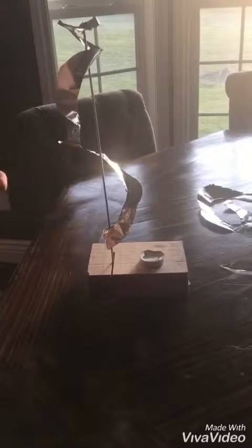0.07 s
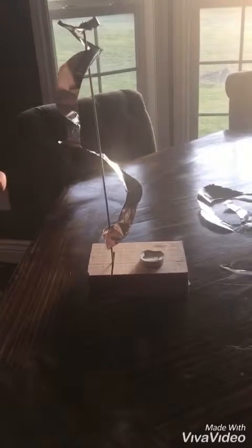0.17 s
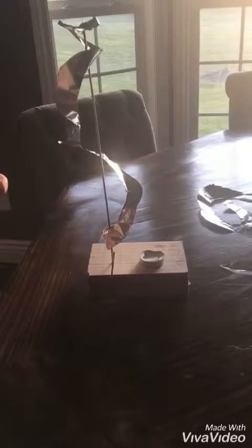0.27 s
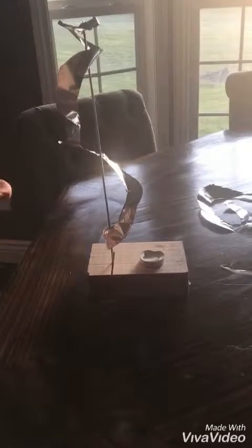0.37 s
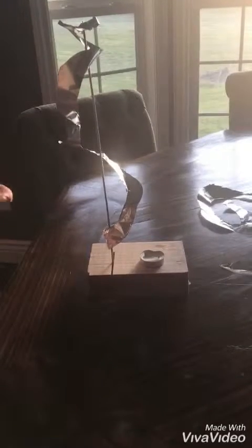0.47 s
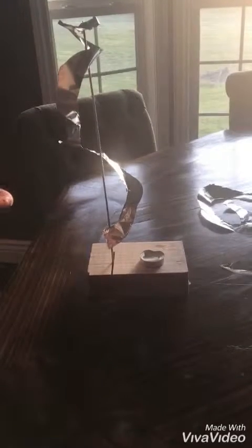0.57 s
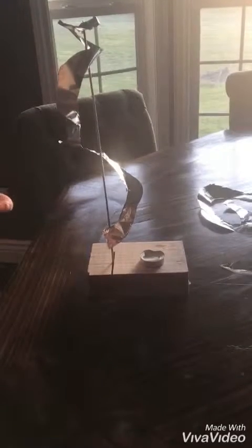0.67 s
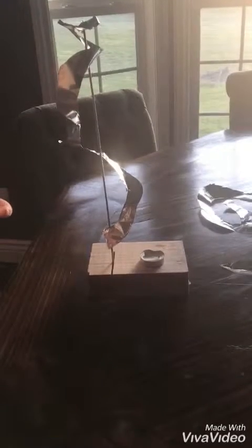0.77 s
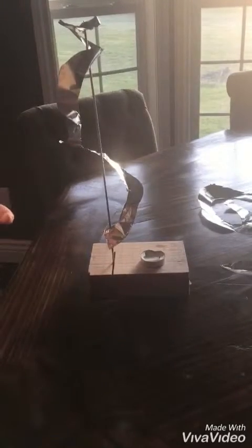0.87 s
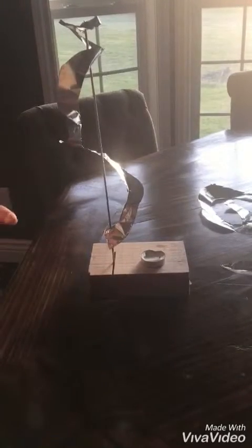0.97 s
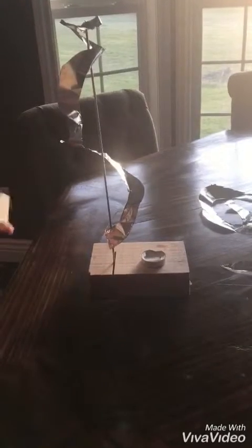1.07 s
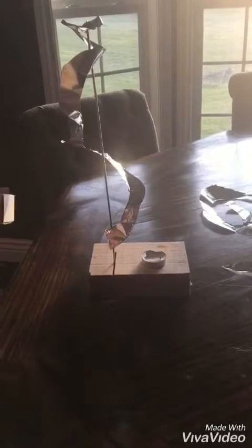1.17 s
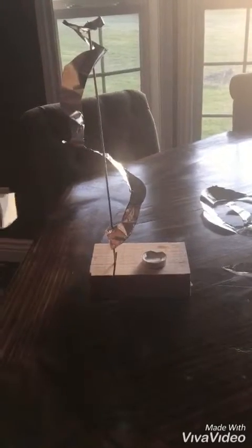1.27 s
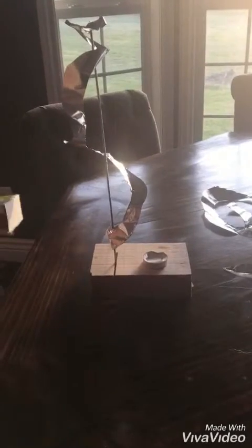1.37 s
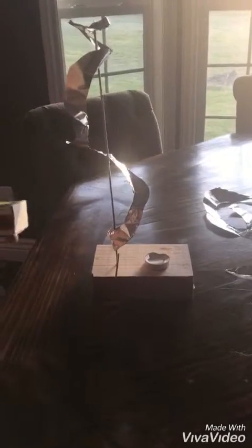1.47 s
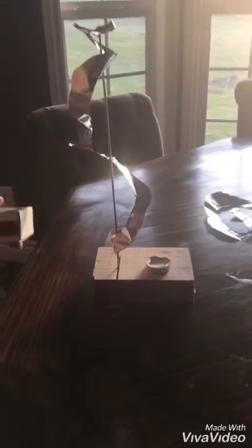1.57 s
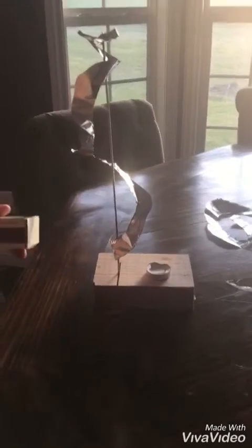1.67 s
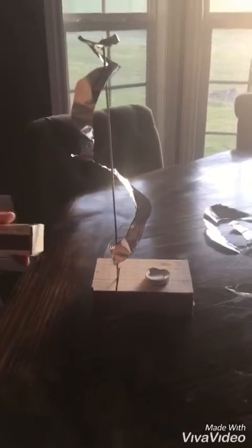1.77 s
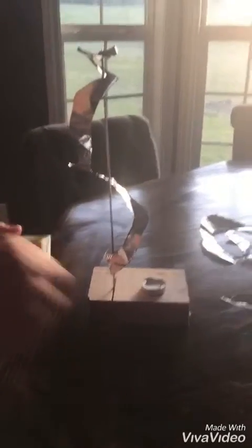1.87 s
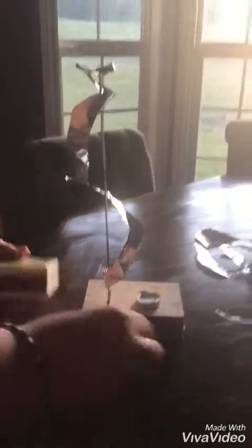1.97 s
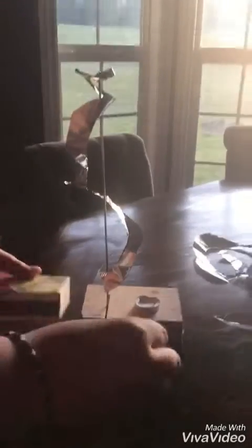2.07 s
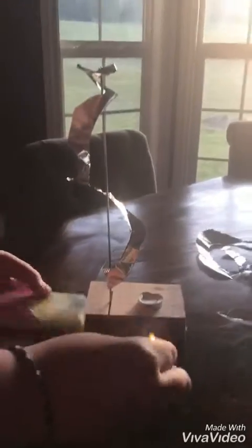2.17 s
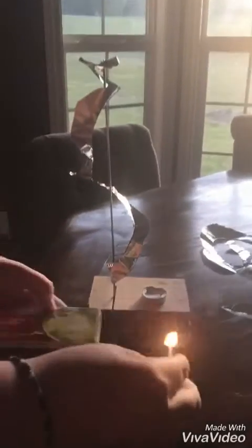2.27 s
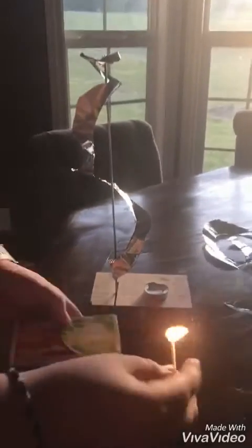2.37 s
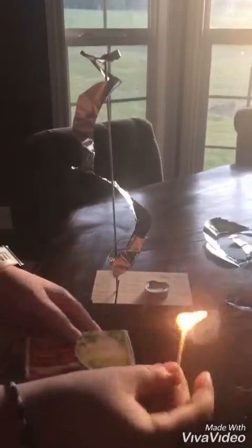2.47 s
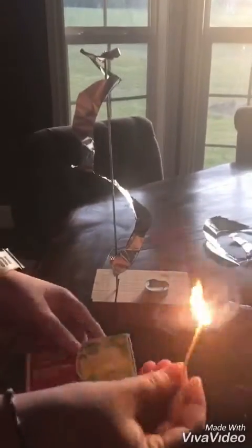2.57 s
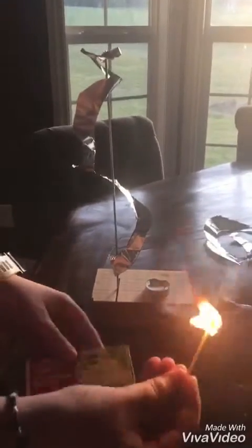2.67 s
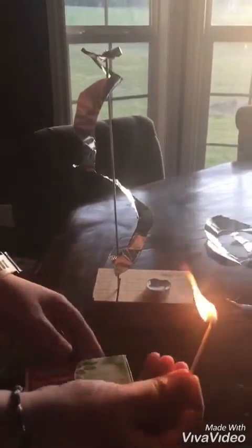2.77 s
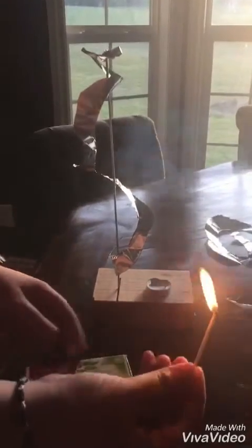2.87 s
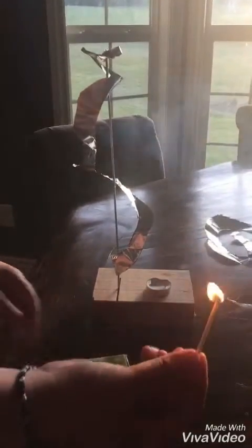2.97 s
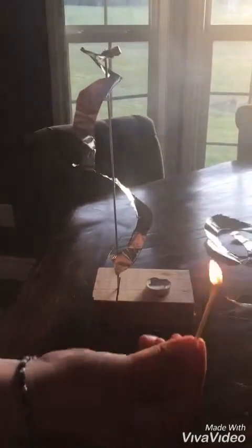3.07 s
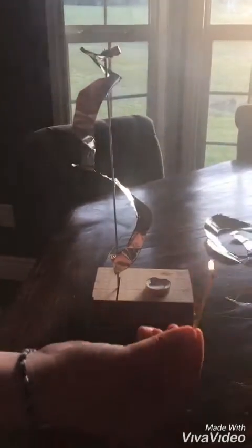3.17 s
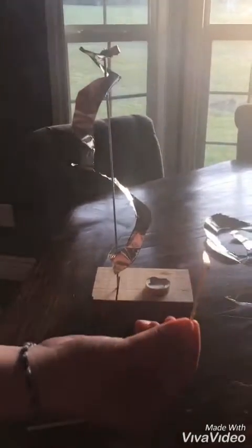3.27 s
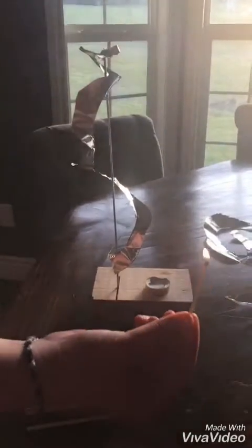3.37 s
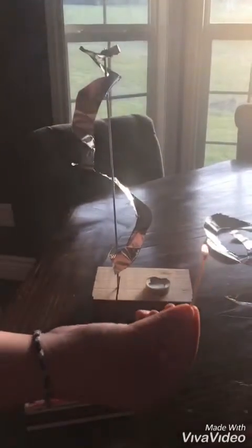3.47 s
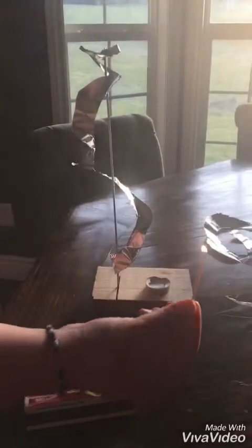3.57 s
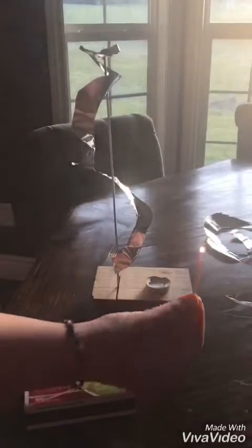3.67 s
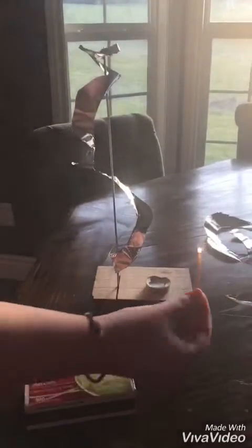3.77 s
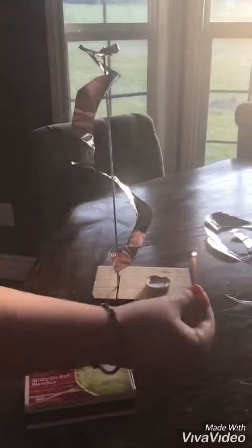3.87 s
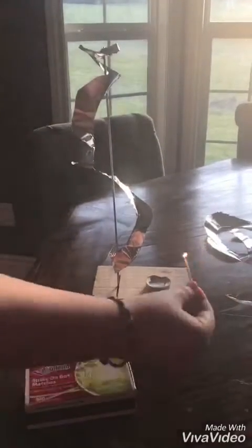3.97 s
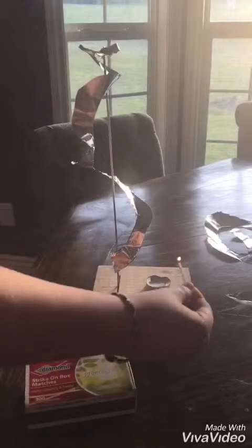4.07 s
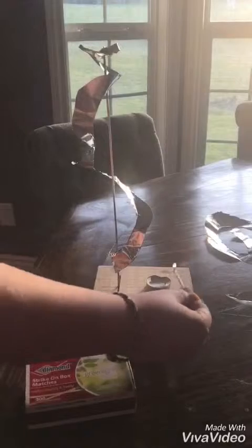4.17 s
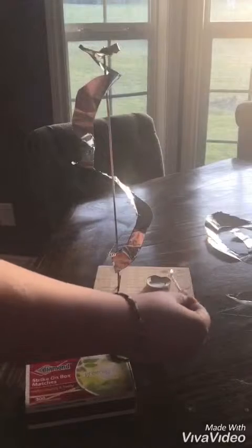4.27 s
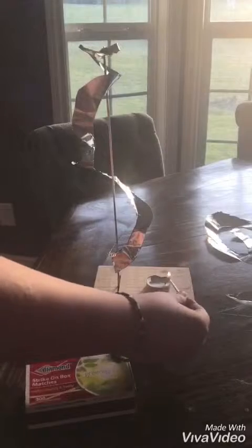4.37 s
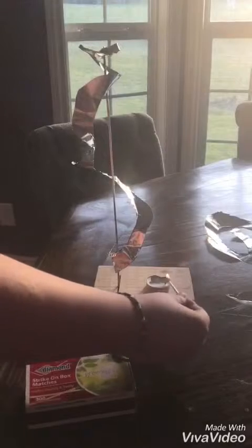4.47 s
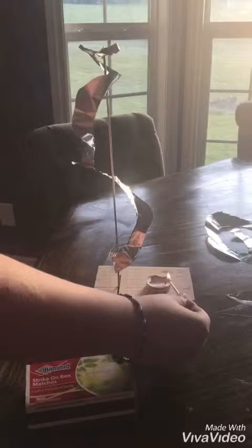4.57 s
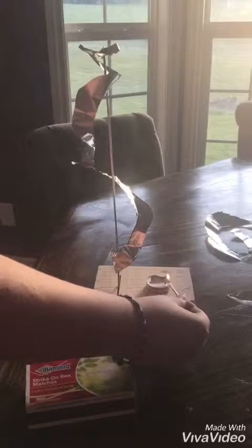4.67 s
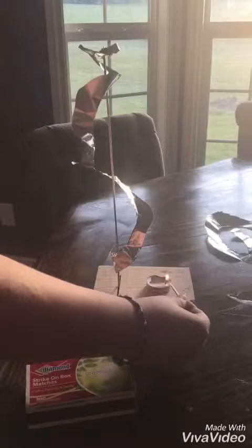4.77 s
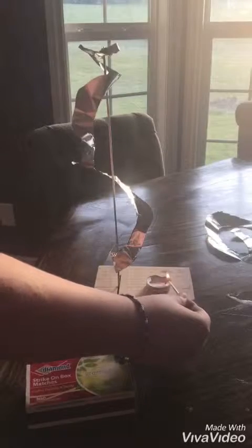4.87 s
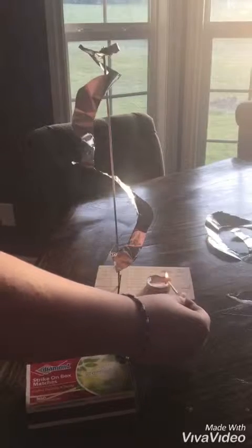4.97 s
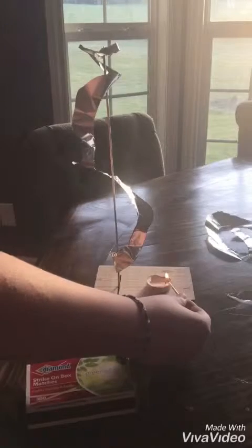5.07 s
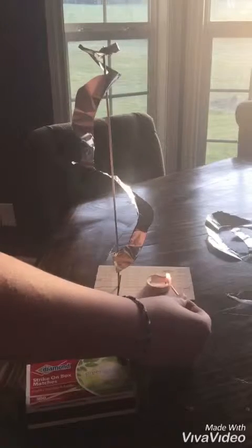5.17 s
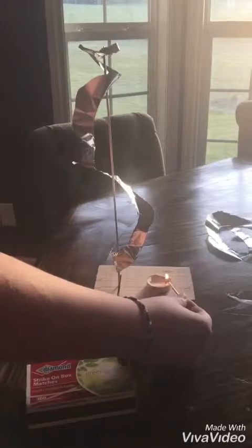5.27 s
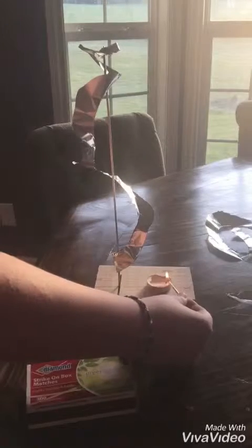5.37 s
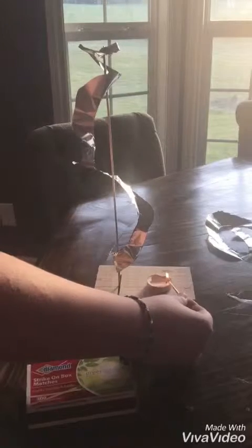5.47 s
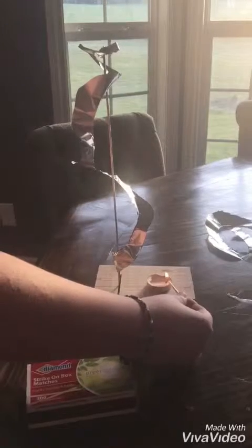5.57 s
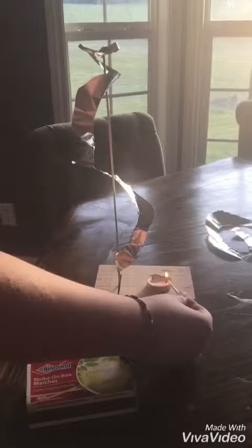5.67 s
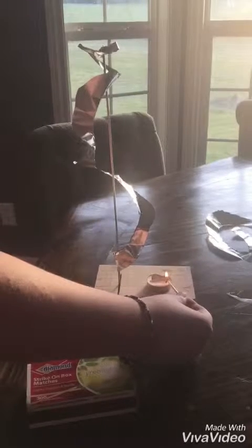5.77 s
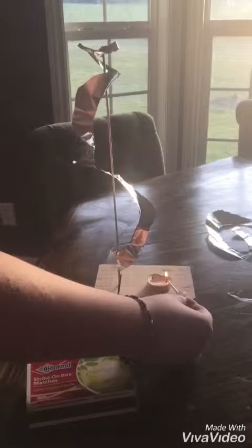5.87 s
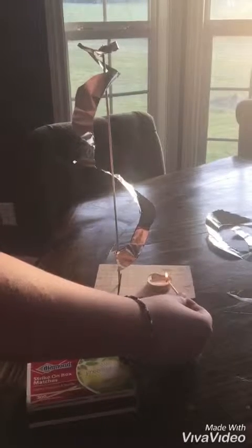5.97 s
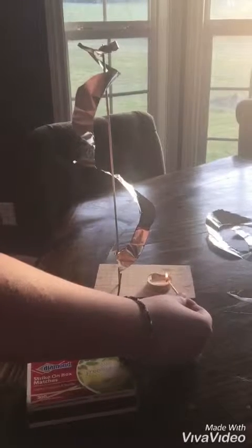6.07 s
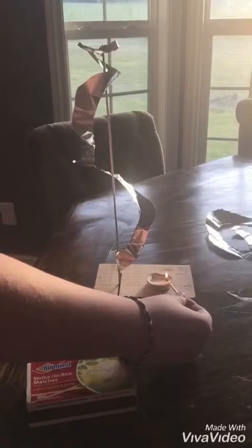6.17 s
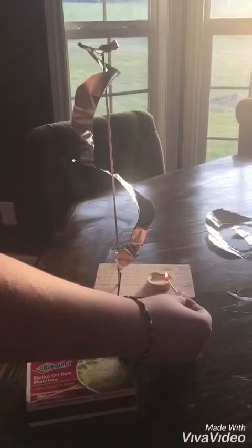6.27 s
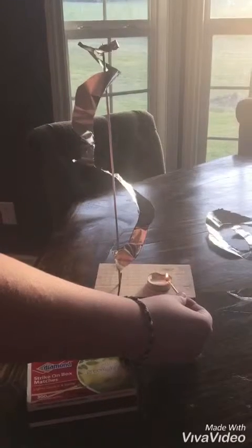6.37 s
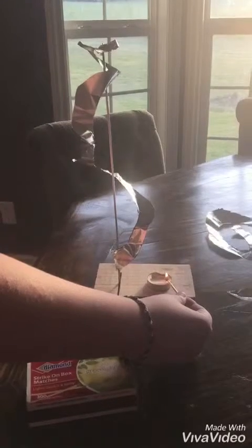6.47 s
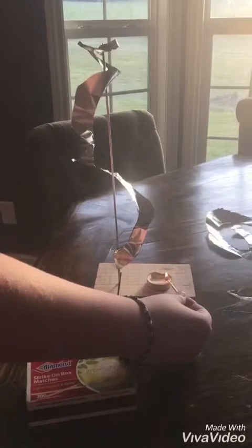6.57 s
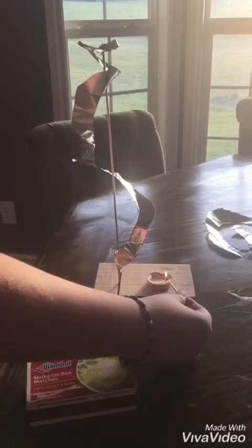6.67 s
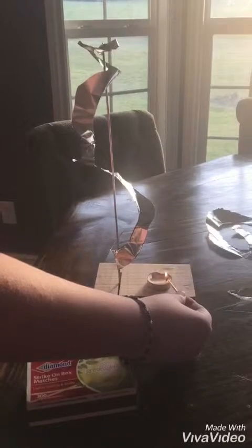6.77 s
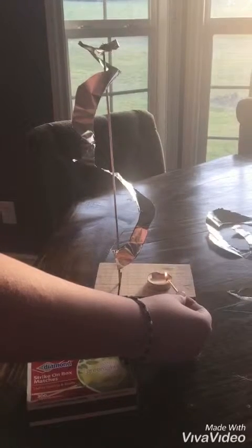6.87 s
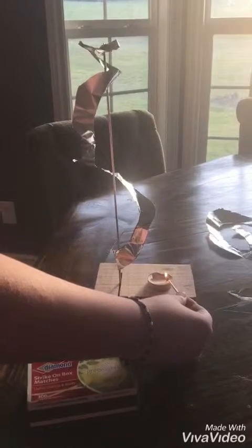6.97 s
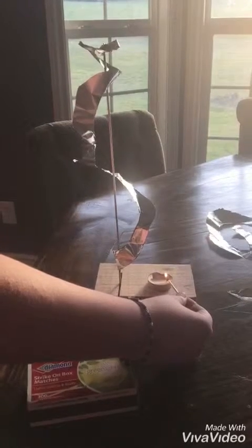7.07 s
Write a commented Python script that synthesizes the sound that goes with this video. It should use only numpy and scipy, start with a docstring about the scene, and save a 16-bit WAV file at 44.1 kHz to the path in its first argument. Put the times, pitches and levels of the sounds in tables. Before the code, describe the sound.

In a quiet room with a low hum, a cardboard matchbox tray slides shut right away, with clicks and rubbing in the fingers. After two seconds a match is struck, a very short, sharp, loud scratch close to the microphone, followed by a soft sputtering hiss. The box scrapes and knocks onto the wooden table, then only faint skin, sleeve and hand scuffs remain.

```python
"""A quiet room with a low hum; a wooden match is struck on its box, close to the microphone, over a table.
Stick-slip grains through coloured bodies make the sliding tray, the fast stroke and the box on the table.
Short decaying modes make the knocks and crackles; fluttering noise makes the hiss of the flaring head.
A soft puff in the flare and late scuffs of hand and sleeve carry more room; hum, throb and air lie beneath."""
import sys
import numpy as np
from scipy import signal
from scipy.fft import rfft, irfft
from scipy.io import wavfile
from scipy.ndimage import uniform_filter1d

SR = 44100
rng = np.random.default_rng(int(sys.argv[2]) if len(sys.argv) > 2 else 0)


def to_wav(s):
    """Save 16-bit WAV."""
    ch = np.atleast_2d(s).T  # columns
    pcm = np.round(np.clip(ch, -1, 1) * 32767)  # PCM
    wavfile.write(sys.argv[1], SR, pcm.astype(np.int16))


N = 313551
TIME = np.arange(N) / SR


def gain_of(db):
    """Decibels to amplitude."""
    return 10 ** (np.asarray(db) / 20)


def evened(x):
    """Scales to rms 1."""
    return x / np.sqrt(np.mean(x ** 2) + 1e-20)


def read(points, hz):
    """Reads a spectrum on a log-frequency axis."""
    f, value = np.transpose(points)
    return np.interp(np.log(hz + 1), np.log(f + 1), value)


def add(mix, s, sound):
    """Mixes a sound in at time s."""
    part = mix[max(round(s * SR), 0):][:len(sound)]
    part += sound[:len(part)]


def through(x, response):
    """Convolves and keeps the scene's length."""
    return signal.oaconvolve(x, response)[:N]


def drift(hz):
    """Slow chance of rms 1, fading out above the given rate."""
    size, step = 2 ** 13, 2 ** 6  # slow points, and samples between them
    f = np.fft.rfftfreq(size, step / SR)
    slow = irfft(rfft(rng.standard_normal(size)) / (1 + (f / hz) ** 2) ** 2)
    return evened(np.interp(np.arange(N) / step, np.arange(size), slow))


def swells(rows):
    """Amplitude of swells (peak time [s], level [dB], rise [s], fade [s]), added in power."""
    shape = 1.4  # flanks: 1 is pointed, 2 is a round bell
    power = np.zeros(N)
    for s, db, rise, fade in rows:
        away = np.maximum((s - TIME) / rise, (TIME - s) / fade)
        near = away < 10
        power[near] += (gain_of(db) * np.exp(-away[near] ** shape)) ** 2
    return np.sqrt(power)


def held(start, length, db, attack_s, release_s):
    """Amplitude of a contact that sets in, holds and lets go."""
    since = np.maximum(TIME - start, 0)
    onset = 1 - np.exp(-since / attack_s)
    release = np.exp(-np.maximum(since - length, 0) / release_s)
    return gain_of(db) * onset * release


def body(colour, rings=(), size=4096):
    """Causal impulse response of energy 1: a broad colour with resonances on top."""
    hz = np.fft.rfftfreq(size, 1 / SR)
    peaks = sum(height / (1 + (2 * (hz - f) / width) ** 2) for f, width, height in rings)
    db = read(colour, hz) + peaks
    log_gain = np.log(gain_of(np.r_[db, db[-2:0:-1]]))
    # minimum phase: the energy comes as early as the colour allows
    response = np.fft.ifft(np.exp(np.conj(signal.hilbert(log_gain)))).real
    return response / np.linalg.norm(response)


def slips(per_s, spread_db, size=600):
    """Stick-slip friction: random tiny impulses of uneven size over faint noise, at steady mean power."""
    excess_db = abs(spread_db) * np.minimum(rng.exponential(1, N), 4)
    heights = gain_of(excess_db) * rng.choice([-1, 1], N)
    train = heights * (rng.random(N) < per_s / SR)
    train = train + 0.11 * rng.standard_normal(N)
    return train / np.sqrt(uniform_filter1d(train ** 2, size) + 1e-9)


def patchy(x, depth_db, size=7):
    """Lets the colour wander in patches a few hundred Hz wide and some tens of ms long."""
    z = signal.stft(x, SR, nperseg=512)[2]
    across_hz = uniform_filter1d(rng.standard_normal(z.shape), size, 0)
    patches = evened(uniform_filter1d(across_hz, size, 1))
    return signal.istft(z * gain_of(depth_db * patches), SR, nperseg=512)[1][:N]


def diffuse(t60, after_s, size=48):
    """A spray of reflections of energy 1 that favours no pitch, each band dying at its own speed."""
    t = np.arange(2 ** 15) / SR
    hz, frame_s, z = signal.stft(rng.standard_normal(len(t)), SR, nperseg=256)
    decay = gain_of(-60 * frame_s / read(t60, hz)[:, None])
    tail = signal.istft(z * decay, SR, nperseg=256)[1][:len(t)]
    spectrum = rfft(tail)
    level = np.sqrt(uniform_filter1d(abs(spectrum) ** 2, size) + 1e-18)
    tail = irfft(spectrum / level) * (t < t[-1] - .1)  # drops what wraps round to the end
    return np.r_[np.zeros(round(after_s * SR)), tail / np.linalg.norm(tail)]


def room(x, early_db, late_db, early_t60=0.066, turn_hz=1.3, count=3):
    """Quick reflections from table and hands, then the room's tail; the paths change as the hands move."""
    # decay of the tail: (frequency [Hz], t60 [s])
    tail_t60 = [(200, 0.5), (1000, 0.63), (3000, 0.27), (7000, .46), (15000, 0.27)]
    # what the walls give back: (frequency [Hz], level [dB])
    wall_colour = [(200, -2.5), (900, 2), (1550, 0), (2450, 0), (4200, 1), (6600, -1.5), (15000, -2)]
    wet = np.zeros(N)
    for k in range(count):
        # the sets of paths take turns; their powers sum to 1
        share = np.sqrt(2 / count) * np.cos(np.pi * (turn_hz * TIME + k / count))
        early = diffuse([(0, early_t60)], after_s=.002)
        late = diffuse(tail_t60, after_s=.012)
        wet += gain_of(early_db) * through(share * x, early)
        wet += gain_of(late_db) * through(share * x, late)
    return through(wet, body(wall_colour))


def machine_hum():
    """Motor and mains hum: sine tones whose pitch and level wander."""
    # (frequency [Hz], middle level [dB], wander [Hz])
    tones = [(119.4, -53.5, .5), (148, -60.5, 2), (208.6, -67, 6.4), (241, -72, .5), (339.4, -60, 1.5),
             (361, -60.5, .4), (482.7, -71.5, 1.3)]
    hum = np.zeros(N)
    for hz, db, wander in tones:
        turns = np.cumsum(hz + wander * drift(hz=9)) / SR + rng.random()
        unevenness_db = np.sqrt(abs(wander)) * .9 * drift(hz=3.4)
        hum += gain_of(db) * np.sqrt(2) * np.sin(2 * np.pi * turns) * gain_of(unevenness_db)
    return hum


def low_throb():
    """The low throb of the room: narrow deep noise, slowly uneven, that at times swells noticeably."""
    # (peak time [s], level [dB], rise [s], fade [s])
    throb_swells = [(.97, -43.5, .14, 0.054), (2.2, -40, 0.058, .06), (2.93, -41.5, 0.053, 0.076),
                    (3.46, -42, 0.035, 0.067), (4.77, -43.5, .08, 0.064), (5.96, -45, .12, .05)]
    # (frequency [Hz], level [dB])
    throb_colour = [(25, -49.5), (50, -25.5), (66, -14), (82, -5.5), (98, 3), (112, -12), (140, -29),
                    (300, -76.5)]
    base_db, wander_db = -53.5, 2.5
    throb = through(rng.standard_normal(N), body(throb_colour, size=16384))
    throb = throb / np.sqrt(uniform_filter1d(throb ** 2, size=6000) + 1e-9)
    steady = gain_of(base_db + wander_db * drift(hz=2.9))
    return throb * np.hypot(steady, swells(throb_swells))


def room_tone(air_db=-51, hiss_db=-66.5):
    """A machine hums and throbs over the rumble of moving air and a faint, nearly even hiss."""
    # low room noise: (frequency [Hz], level [dB])
    air_colour = [(20, -37.5), (35, -19.5), (55, 2), (75, -2.5), (110, 1.5), (140, -1), (170, -3),
                  (200, 0.5), (250, -4), (285, -13), (345, -3), (400, -11), (470, -14.5), (520, -27.5),
                  (610, -17.5), (750, -33), (1300, -80)]
    # faint hiss: (frequency [Hz], level [dB])
    hiss_colour = [(300, -3.5), (700, -2.5), (1100, 1.5), (1350, -2.5), (2500, -6.5), (4000, -8),
                   (5000, -12.5), (6000, -11), (9300, -17), (10500, -21.5), (12000, -19), (16000, -24)]
    air = through(rng.standard_normal(N), body(air_colour, size=16384))
    hiss = through(rng.standard_normal(N), body(hiss_colour)) * gain_of(0.37 * drift(hz=5))
    hiss = patchy(hiss, depth_db=1.16)
    return machine_hum() + low_throb() + gain_of(air_db) * air + gain_of(hiss_db) * hiss


def brushes(strokes, colour):
    """Light strokes or dull rubs of skin and cloth: fine friction that swells and fades."""
    pressure = sum(gain_of(db) * np.exp(-.5 * ((TIME - s) / half) ** 2) for s, db, half in strokes)
    return through(slips(per_s=10000, spread_db=2) * pressure, body(colour))


def skin_and_sleeve():
    """Skin and sleeve brush past as light friction."""
    # (middle time [s], level [dB], half length [s])
    brush_strokes = [(0.235, -54, 0.018), (.65, -64.5, 0.012), (0.755, -59, 0.017), (.95, -66.5, 0.24),
                     (1.4, -71.5, 0.11), (1.83, -69, 0.2), (3.7, -72, 0.34), (4.069, -63, 0.013),
                     (4.595, -68.5, 0.13), (5.139, -70, 0.073)]
    # (frequency [Hz], level [dB])
    brush_colour = [(700, -8.5), (2000, 3.5), (4000, 1), (7000, -2), (9000, -2), (10500, -6.5),
                    (12000, -4.5), (16000, -7.5)]
    return brushes(brush_strokes, brush_colour)


def arm_on_table():
    """The arm rubs on the table as friction of a duller colour."""
    # (middle time [s], level [dB], half length [s])
    arm_rubs = [(5.81, -67.5, 0.039), (5.885, -63, .025), (5.97, -72.5, 0.054), (6.58, -69, 0.046)]
    # (frequency [Hz], level [dB])
    arm_colour = [(250, -13), (700, 1.5), (1100, 0), (1500, -8), (2000, -5.5), (3000, -23), (8000, -28)]
    return brushes(arm_rubs, arm_colour)


def puff_and_scuffs():
    """Short grainy sounds, each with two resonances: a soft puff in the flare, then scuffs of hand and sleeve."""
    # the puff, then the scuffs:
    # (start time [s], level [dB], rise [s], fade [s], lower resonance [Hz], upper resonance [Hz])
    grainy_rows = [(2.428, -54.5, .01, .025, 2780, 2970), (3.526, -52.5, 0.0077, 0.048, 2050, 2350),
                   (4.350, -52, 0.012, 0.044, 2190, 3930), (4.907, -49, 0.024, 0.04, 1120, 2080),
                   (5.298, -56.5, 0.022, 0.046, 1810, 2100)]
    # (frequency [Hz], level [dB])
    grainy_colour = [(250, -18), (650, -1), (950, -9), (1350, -1.5), (1650, -7), (2050, -6.5), (3000, -10),
                     (3900, -9), (5000, -19), (8000, -22.5), (15000, -35)]
    grain = slips(per_s=1800, spread_db=2)
    out, t = np.zeros(N), np.arange(SR // 2) / SR
    for s, db, rise, fade, low_hz, high_hz in grainy_rows:
        push = gain_of(db) * np.minimum(t / rise, 1) * np.exp(-np.maximum(t - rise, 0) / fade)
        pushed = push * grain[round(s * SR):][:len(t)]
        response = body(grainy_colour, [(low_hz, 260, 9), (high_hz, 900, 8)])
        add(out, s, signal.oaconvolve(pushed, response))
    return out


def flare(path_s=0.0013, sway_s=0.000181, bounce=0.36, sputter=0.67):
    """Gas jets and sputters of the burning head; its echo off the table, as the match moves, sweeps the colour."""
    # spurts: (peak time [s], drive level [dB], rise [s], fade [s])
    spurts = [(2.09, -58, .04, 0.27), (2.45, -56.5, .016, 0.034), (2.52, -59, 0.044, .13),
              (2.69, -55.5, 0.02, 0.11), (2.8, -51.5, 0.016, 0.017), (2.846, -56, 0.011, .008),
              (2.928, -60.5, .01, .05)]
    # (frequency [Hz], level [dB])
    flare_colour = [(800, -7), (2000, 2), (3200, 2), (5000, -3), (6500, -3.5), (9000, -1.5), (10500, -7),
                    (12000, -8), (16000, -10)]
    jets = slips(per_s=6000, spread_db=4.5) * gain_of(2.0 * drift(hz=60) - 3.5)
    pops = sputter * slips(per_s=240, spread_db=2.5, size=4000)
    hiss = through((jets + pops) * swells(spurts), body(flare_colour))
    hiss = patchy(hiss, depth_db=3)
    echo = np.interp(TIME - path_s - sway_s * drift(hz=5.4), TIME, hiss)
    return hiss + bounce * echo


def knocks_and_crackles(crack=0.1, crack_s=0.00057):
    """Matches, tray and wood knock, and the burning head crackles: modes near a centre ring after a tick."""
    # (time [s], nominal level [dB], centre [Hz], spread [octaves])
    knock_rows = [(.759, -28, 1750, 0.5), (.779, -41, 1550, 0.1), (.842, -44.5, 1400, .4),
                  (.8485, -27.5, 3380, 1.2), (.9195, -38, 2500, .33), (.9877, -33.5, 3880, .36),
                  (1.002, -37, 1590, .34), (1.2145, -42, 1500, 0.28), (1.3726, -33, 1450, .27),
                  (1.5477, -38.5, 2330, 0.37), (1.56, -43.5, 2300, 0.58), (2.103, -34, 1400, .67),
                  (2.1255, -33.5, 1300, .8), (2.287, -39, 1370, 0.64), (2.6855, -47, 1500, 0.75),
                  (2.7146, -38, 1200, 0.37), (2.7527, -26, 1160, 0.18), (2.773, -29, 1200, .53),
                  (2.8245, -19.5, 1710, 0.63), (2.9217, -31, 1800, 1.1), (2.9625, -31, 1100, 0.9),
                  (3.0056, -43, 1300, 0.65), (3.5369, -39, 2103, .17), (4.356, -42.5, 2250, .35),
                  (4.9095, -42.5, 2380, .35), (5.303, -45, 2000, 1.3)]
    # modes of the cardboard box, lent to the crackles too: (frequency [Hz], level [dB], t60 [s])
    box_modes = [(640, 6, 0.022), (870, 0, 0.034), (1079, 4.5, 0.013), (1510, 2, 0.016),
                 (1648, -2.5, 0.0175), (1910, -5.5, 0.0089), (2415, 4.5, 0.0098), (2960, -5, 0.0068),
                 (3700, -2.5, 0.0056), (4300, -4.5, 0.0076), (5460, -2, 0.0054), (6030, 0, 0.0046),
                 (6850, 1.5, 0.0051), (8650, -9, .003), (12000, -8, .003)]
    out, t = np.zeros(N), np.arange(2 ** 11) / SR
    hz, db, t60 = np.transpose(box_modes)[:, :, None]
    decay = np.exp(-np.log(1000) * t / t60)
    onset = 1 - np.exp(-t / 0.000124)
    for s, level_db, centre_hz, octaves in knock_rows:
        detune, phase = rng.standard_normal((2, len(box_modes), 1))
        nearness = np.exp(-.5 * (np.log2(hz / centre_hz) / octaves) ** 2)
        weight = nearness * gain_of(db) * decay
        waves = np.sin(2 * np.pi * hz * (1 + .025 * detune) * t + np.pi * phase)
        ring = (weight * waves).sum(0) * onset / np.linalg.norm(weight[:, 0])
        sharpness = octaves ** 2 * centre_hz / hz.mean()  # grows with spread and pitch
        tick = crack * sharpness * rng.standard_normal(len(t)) * np.exp(-t / crack_s)
        add(out, s, gain_of(level_db) * (ring + tick))
    return out


def rub(contact, response, per_s, spread_db, edge):
    """Friction under the pushes on one contact; harder pressure makes sharper slips and so more treble."""
    # tray in its sleeve, box in the fingers, box on the table:
    # (peak time [s], drive level [dB], rise [s], fade [s], contact [name])
    pushes = [(.002, -37.5, .01, 0.018, "tray"), (.092, -39, 0.071, 0.063, "tray"),
              (.225, -42.5, 0.021, .042, "tray"), (0.514, -61.5, 0.038, 0.079, "tray"),
              (.8, -57, .02, 0.022, "fingers"), (0.869, -53.5, 0.024, 0.041, "fingers"),
              (1.03, -55, 0.051, 0.029, "fingers"), (1.232, -49.5, .04, .032, "fingers"),
              (1.33, -46.5, .018, 0.034, "fingers"), (1.383, -43.5, 0.026, 0.024, "fingers"),
              (2.45, -59, 0.016, 0.11, "table"), (2.61, -53.5, 0.038, .07, "table"),
              (2.69, -49, .015, .04, "table"), (2.754, -42.5, 0.0089, .024, "table"),
              (2.835, -44.5, .03, .025, "table"), (2.89, -39, 0.021, 0.021, "table"),
              (2.937, -36.5, 0.03, 0.017, "table"), (3.0, -56, 0.039, 0.032, "table")]
    pressure = swells([row[:-1] for row in pushes if row[-1] == contact])
    grains = slips(per_s, spread_db) * pressure
    sharpness = edge * np.sqrt(pressure / pressure.max())
    return through(grains + sharpness * np.diff(grains, prepend=0), response)


def box_friction():
    """Cardboard rubs on cardboard, on fingers and on wood; the grip keeps changing how the box rings."""
    # tray in its sleeve: (frequency [Hz], level [dB])
    slide_colour = [(300, -49), (520, -28), (660, -11), (790, -22.5), (900, -9), (1200, -9), (1580, 1),
                    (2000, -3.5), (2400, -6), (2800, -15.5), (3700, -12), (4900, -24), (6500, -21),
                    (8000, -29.5), (15500, -36)]
    # box in the fingers: (frequency [Hz], level [dB])
    shift_colour = [(250, -30.5), (500, -12.5), (680, -5.5), (900, -0.5), (1100, -3), (1600, 1.5),
                    (1950, -1.5), (2550, -20.5), (3050, -13.5), (3800, -17.5), (5000, -28.5), (9000, -37.5),
                    (15000, -39.5)]
    # box on the table: (frequency [Hz], level [dB])
    table_colour = [(120, -35.5), (250, -5.5), (450, -11.5), (680, -8), (920, 0), (1150, -5.5),
                    (1500, -8.5), (2100, -17.5), (2800, -17.5), (3800, -18.5), (5000, -31), (6300, -35),
                    (7600, -42), (15000, -51)]
    # resonances on top of each colour: (frequency [Hz], width [Hz], height [dB])
    tray_body = body(slide_colour, [(1680, 200, 2.5), (3300, 400, 2.3)])
    finger_body = body(shift_colour, [(1590, 430, 0.91)])
    table_body = body(table_colour, [(1540, 230, 2.4), (2290, 540, 1.3)])
    slide = rub("tray", tray_body, per_s=5000, spread_db=2.5, edge=.25)
    shift = rub("fingers", finger_body, per_s=1000, spread_db=0.0, edge=.55)
    down = rub("table", table_body, per_s=2100, spread_db=3.0, edge=0.47)
    return slide + patchy(shift + down, depth_db=3.5)


def head_drag():
    """The head drags dully over the strip before it bites."""
    # (start time [s], length [s], level [dB])
    drag_contact = (1.965, .024, -29)
    # (frequency [Hz], level [dB])
    drag_colour = [(150, -24.5), (350, -19.5), (600, -6), (880, 0), (1120, -5.5), (1400, -3), (1850, 1),
                   (2250, -11.5), (4000, -20.5), (9000, -26.5), (15000, -29)]
    pressure = held(*drag_contact, attack_s=.0015, release_s=.002)
    return through(slips(per_s=3400, spread_db=0.5, size=120) * pressure, body(drag_colour))


def strike():
    """The head drags, bites into the grit and tears along it; stick and box ring under the grains."""
    # bites into the striking strip, overlapping: (start time [s], length [s], level [dB])
    bites = [(1.983, 0.001, -22), (1.9868, 0.019, -20.5), (1.9875, .0105, -18.5), (2.0035, 0.0016, -17)]
    # (frequency [Hz], level [dB])
    stroke_colour = [(100, -38.5), (200, -14.5), (315, -8), (480, -26), (700, -11), (1000, -11.5),
                     (1530, -1.5), (2300, -8), (2560, -18), (3000, -3.5), (4400, -12.5), (6600, -8.5),
                     (9500, -9.5), (10400, -17), (11300, -12.5), (16000, -15)]
    # resonances of box and stick: (frequency [Hz], width [Hz], height [dB])
    stroke_rings = [(890, 90, 0.5), (1537, 130, 2), (3020, 160, 6), (3570, 200, 4.5), (6530, 220, 7),
                    (8400, 200, 5)]
    # grains of the head that catch and snap: (time [s], peak level [dB])
    snaps = [(1.973, -28), (1.9774, -23), (1.983, -10.5), (1.997, -3.5), (1.9972, -10), (2.0043, -11)]
    # what the stroke throws out to the sides: (frequency [Hz], level [dB])
    side_colour = [(150, -19.5), (350, -8), (650, -3.5), (1000, 1.5), (1500, -1), (1900, -1.5), (2400, 0.5),
                   (3100, -0.5), (4600, -6), (6600, -6), (9200, -7), (10400, -14), (11600, -8.5),
                   (16000, -13.5)]
    ring = body(stroke_colour, stroke_rings)
    bite = np.sqrt(sum(held(*row, attack_s=0.00027, release_s=0.00058) ** 2 for row in bites))
    grit = slips(per_s=11000, spread_db=1.0, size=120) * bite
    for s, db in snaps:
        add(grit, s, gain_of([db]) / abs(ring).max())
    drag = head_drag()
    sideways = through(grit, body(side_colour)) + drag
    echoes = room(sideways, early_db=-12.0, late_db=-15.5, early_t60=.12)
    return through(grit, ring) + drag + echoes


def scene():
    """The strike is close to the microphone; the other near sounds and the far ones have their own echoes."""
    near = box_friction() + knocks_and_crackles() + flare() + skin_and_sleeve() + arm_on_table()
    far = puff_and_scuffs()
    echoes = room(near, early_db=-9, late_db=-19.0) + room(far, early_db=-1.5, late_db=-18.0)
    return (room_tone() + far + near + echoes + strike())[None]


def record(dry):
    """The band limit of the recorder: a steep low-pass."""
    edge_hz = 15850
    low_pass = signal.firwin(511, edge_hz, window=("kaiser", 9), fs=SR)
    return signal.oaconvolve(dry, low_pass[None], "same")


dry = scene()
out = record(dry)
to_wav(out)
```